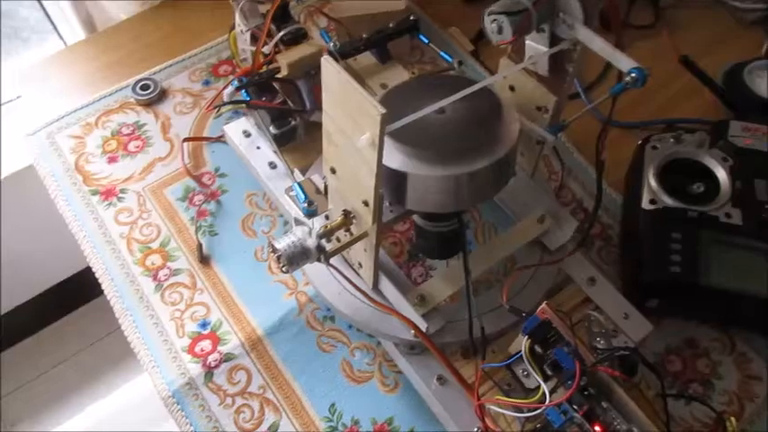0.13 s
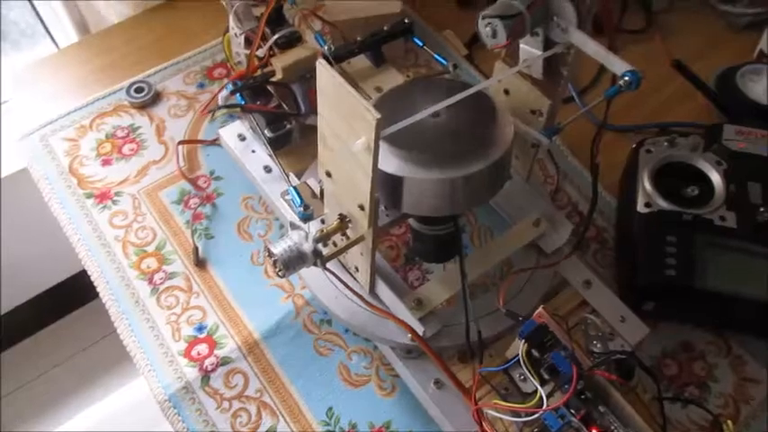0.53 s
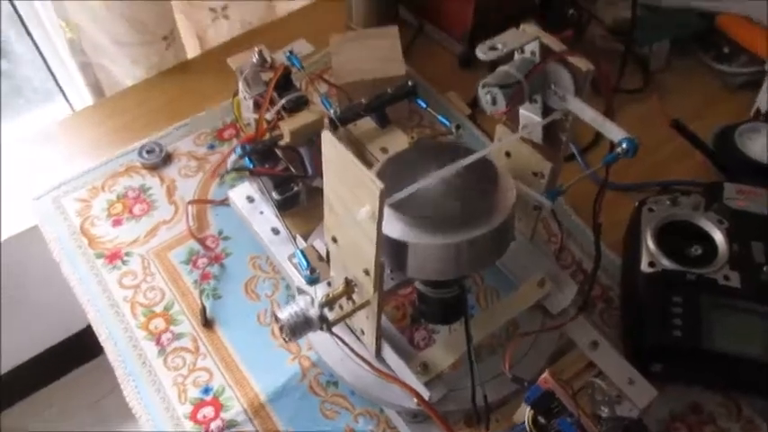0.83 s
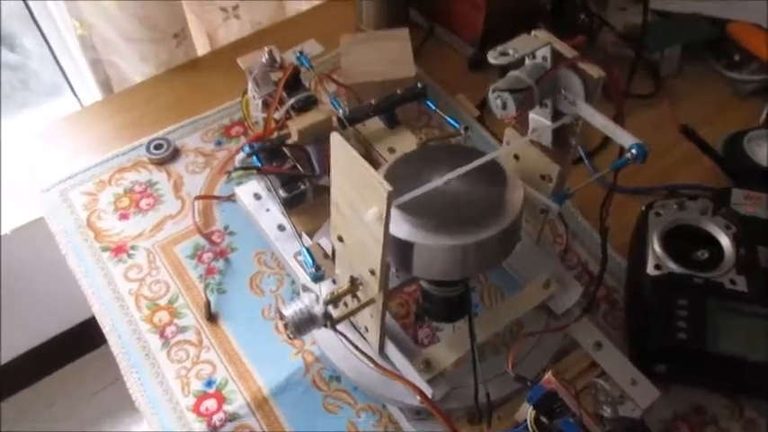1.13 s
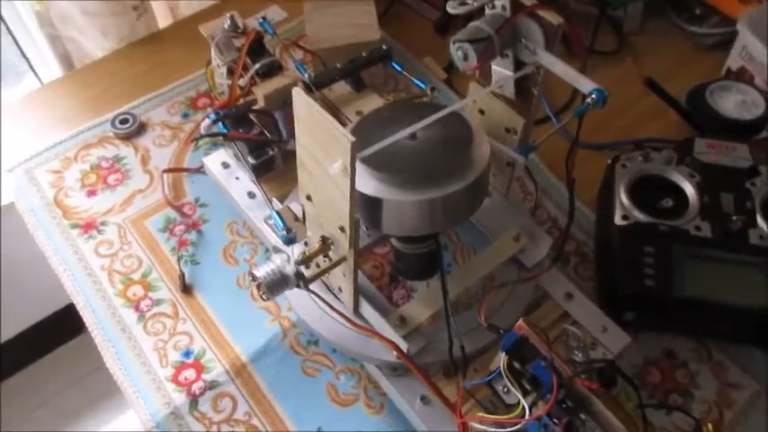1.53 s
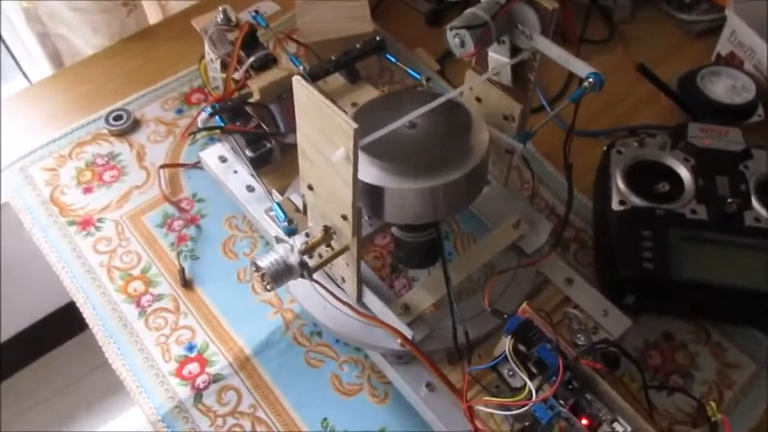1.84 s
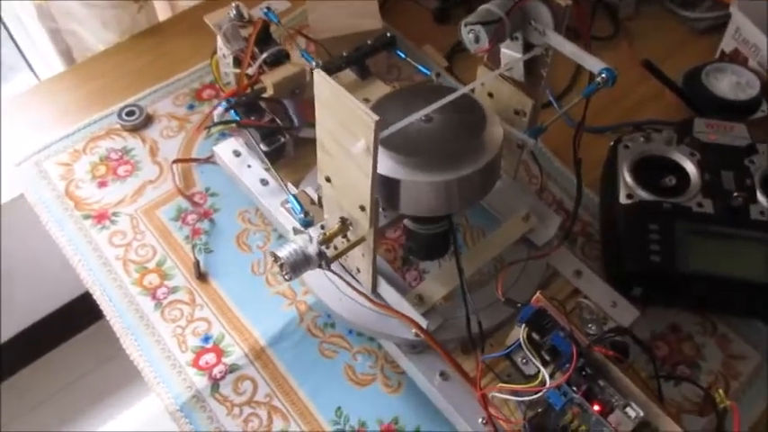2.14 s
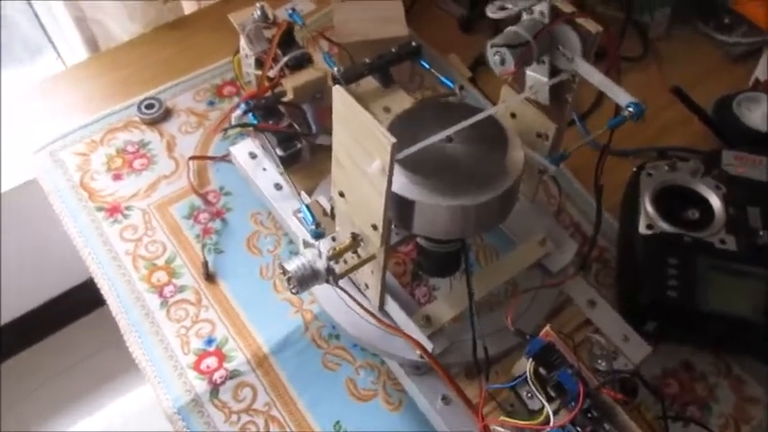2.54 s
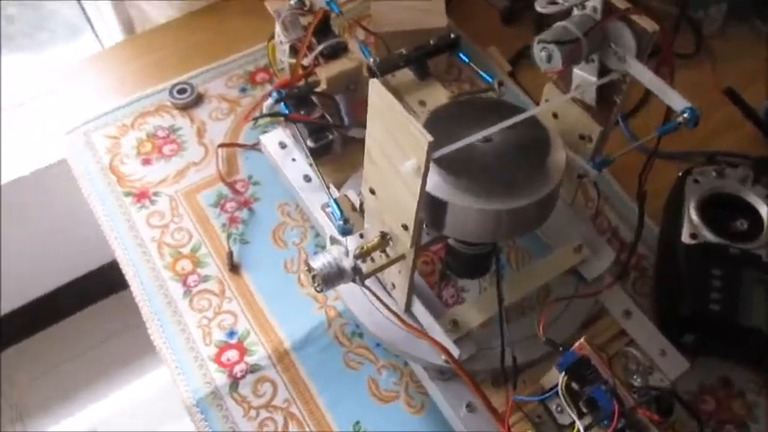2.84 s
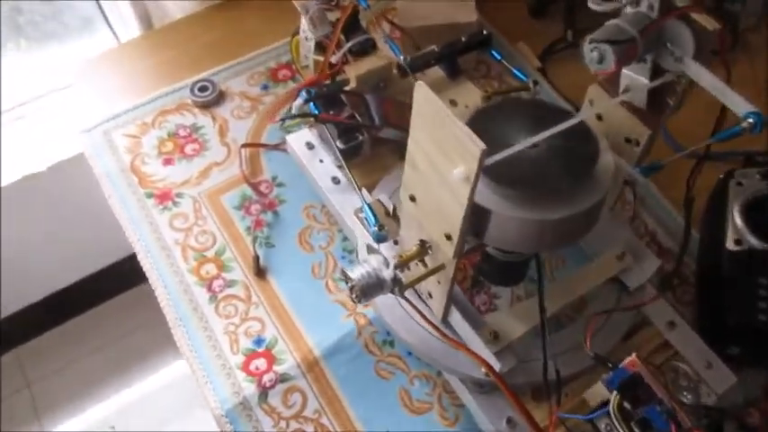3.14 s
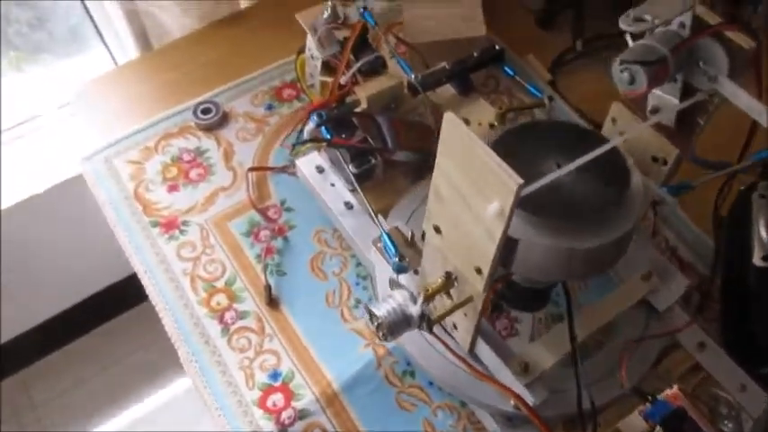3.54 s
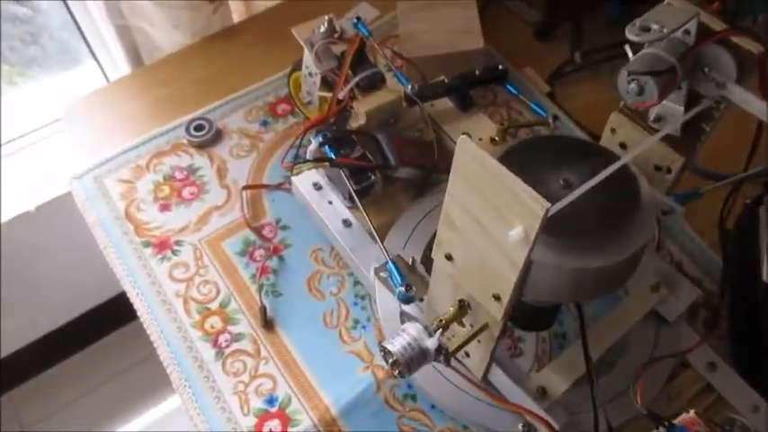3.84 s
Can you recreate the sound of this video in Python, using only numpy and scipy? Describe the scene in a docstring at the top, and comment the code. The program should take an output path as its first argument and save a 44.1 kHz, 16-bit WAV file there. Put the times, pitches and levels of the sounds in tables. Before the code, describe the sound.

A motor-driven steel flywheel cuts in abruptly after brief silence, whirring steadily while a loose metal joint ticks rapidly in ratchet-like pulses, with duller frame knocks beneath; close microphone, small room.

```python
"""Flywheel rattling in a gimbal on a table

Close by, a steel flywheel spins at steady speed on a small motor in a light gimbal frame; the sound cuts in abruptly.
The unbalanced rotor throws a loose joint to and fro: once a turn a bright metal tick rings the joint,
and nearly half a turn later a duller knock rings the frame and its upright plate; at times the joint rubs.
A slower wobble groups the ticks in about threes, like a ratchet. A short room tail follows these contacts;
under them filtered grains make the bearing whirr and wavering sines make the table hum."""
import sys
import numpy as np
from scipy import signal
from scipy.fft import rfft, irfft
from scipy.io import wavfile

SR = 44100
rng = np.random.default_rng(int(sys.argv[2]) if len(sys.argv) > 2 else 0)


def store_wav(level_fs):
    """Save 16-bit WAV to argv[1]."""
    pcm = np.round(np.clip(np.atleast_2d(level_fs), -1, 1) * 32767)
    wavfile.write(sys.argv[1], SR, pcm.T.astype(np.int16))


N = 176400
TIME = np.arange(N) / SR  # s
ROTOR_HZ, WOBBLE_HZ = 70.72, 22.55
# Course of the bearing whirr, which the hum partly follows: start_s, relative level_db
WHIRR_COURSE = [(.33, -40.5), (.68, -37), (.82, -34), (1.0, -39.5), (1.25, -35.5), (1.42, -37),
                (1.55, -34.5), (1.8, -34), (2.25, -36), (2.4, -33.5), (2.75, -36), (3.2, -33), (3.4, -36),
                (3.85, -34), (4, -35)]


def from_db(db):
    """Decibels to gain."""
    return 10 ** (np.asarray(db) / 20)


def rms_one(x):
    """Scale to unit rms."""
    return x / np.sqrt(np.mean(x ** 2) + 1e-20)


def curve(rows, at=TIME):
    """A time table, joined by straight lines."""
    rows = np.array(rows)
    return np.interp(at, rows[:, 0], rows[:, 1])


def drift(rate_hz):
    """Random wander of unit rms through `rate_hz` fresh points a second."""
    return rms_one(np.interp(TIME * rate_hz, np.arange(400), rng.standard_normal(400)))


def resonate(x, modes, wander=0):
    """Parallel damped modes (Hz, width Hz, dB) of alternating sign; pitches stray by the share `wander`."""
    out = 0
    for k, (hz, width_hz, db) in enumerate(modes):
        decay = np.exp(-np.pi * width_hz / SR)
        pitch_hz = hz * (1 + wander * drift(WOBBLE_HZ))
        spin = np.exp(2j * np.pi * np.cumsum(pitch_hz) / SR)
        # Shift the mode down to 0 Hz, smooth it there, and shift it back.
        shifted = (x + 1e-18) * spin.conj()
        envelope = signal.lfilter([1 - decay, 1 - decay], [1, -decay], shifted)
        out = out + (-1) ** k * from_db(db) * np.real(spin * envelope)
    return out


def colour(x, points):
    """Filter a sound by a (Hz, dB) curve, straight over log frequency."""
    hz, db = np.transpose(points)
    bin_hz = np.arange(N // 2 + 1) * SR / N
    gain = from_db(np.interp(np.log(bin_hz + 1), np.log(hz), db))
    return irfft(rfft(x) * gain, N)


def place(times, levels_db, bursts):
    """Lay one burst of force, its spectrum partly evened and its energy set by its level, at each time."""
    out = np.zeros(N + SR)
    spectra = rfft(bursts)
    bursts = irfft(spectra / np.sqrt(abs(spectra) + 1e-9))
    for s, db, burst in zip(times, levels_db, bursts):
        i = int(s * SR)
        out[i:i + len(burst)] += from_db(db) * burst / np.linalg.norm(burst)
    return out[:N]


def turns():
    """The moment in each turn at which the joint closes."""
    # How late in the turn the joint closes: start_s, delay_ms
    closing_lag = [(.33, 3.3), (.5, 3.0), (1.25, 4.1), (1.95, 4.3), (2.15, 3.9), (2.42, 5.4), (2.62, 4.6),
                   (3.25, 4.1), (3.65, 3.4), (4, 3.4)]
    s = np.arange(int(N / SR * ROTOR_HZ) + 1) / ROTOR_HZ
    return s + curve(closing_lag, s) / 1000


def with_hard_blows(s, db, rows):
    """Each hard blow takes the place of the nearest ordinary one."""
    s, db = s.copy(), db.copy()
    for at, level_db in rows:
        k = np.argmin(abs(s - at))
        s[k], db[k] = at, level_db
    return s, db


def ticks():
    """A snap with tiny rebounds rings the joint once a turn, harder at the crest of the wobble."""
    # Mean force of the rattle: start_s, relative level_db
    rattle_course = [(.33, -41), (.46, -31.5), (.67, -34), (.8, -26), (1.06, -27.5), (1.32, -19.5),
                     (1.8, -8.5), (2.2, -19.5), (2.45, -22.5), (2.65, -15), (2.92, -24.5), (3.12, -13.5),
                     (3.6, -13.5), (4, -11)]
    # The hardest ticks, on the same scale: start_s, relative level_db
    hardest_ticks = [(0.4694, -14), (0.7243, -14), (0.7671, -11), (0.7812, -12), (0.8094, -13),
                     (0.8237, -10), (0.8517, -15), (0.8943, -14), (0.9085, -13), (1.1347, -10),
                     (1.263, -12), (1.2912, -12), (1.305, -9), (1.3474, -11), (1.3759, -11), (1.4743, -12),
                     (1.4888, -14), (1.517, -13), (1.5731, -12), (1.6162, -11), (1.6452, -12),
                     (1.6583, -10), (1.7013, -10), (1.7293, -12), (1.7433, -12), (1.7858, -12),
                     (1.8142, -12), (1.8283, -9), (1.885, -8), (1.9555, -9), (1.97, -13), (1.9977, -11),
                     (2.0538, -9), (2.0828, -12), (2.096, -11), (2.2807, -13), (2.3237, -10), (2.338, -12),
                     (2.5775, -14), (2.5921, -12), (2.6207, -12), (2.6337, -9), (2.6768, -7), (2.7617, -12),
                     (2.7894, -12), (2.8042, -12), (2.9318, -14), (3.0302, -10), (3.0722, -11),
                     (3.1294, -14), (3.2135, -12), (3.299, -9), (3.3129, -9), (3.3408, -13), (3.3692, -13),
                     (3.3833, -12), (3.44, -12), (3.6796, -12), (3.7225, -10), (3.7366, -11), (3.7641, -13),
                     (3.7797, -13), (3.7945, -13), (3.8079, -7), (3.8216, -10), (3.8495, -12),
                     (3.8641, -12), (3.8777, -8), (3.9202, -8), (3.9483, -11), (3.9623, -10)]
    # Modes of the metal joint: pitch_hz, width_hz, level_db, change_db as the gimbal swings round
    joint_modes = [(1060, 540, -13.5, 1), (3726, 50, -0.5, 3), (4537, 210, -6.5, 1), (5620, 360, -8.5, 7),
                   (6345, 110, 4, -0.5), (6920, 220, 2, -1.5), (7390, 250, 2, 1), (8720, 184, -8.5, 5.5),
                   (9570, 246, -6, 3.5), (10140, 76, -3, -36), (10730, 240, -5.5, -14),
                   (11580, 920, -10, -1), (13400, 730, -14.5, -4), (14460, 790, -16, 1)]
    swing_db, scatter_db, soft_top_db, force_gain_db = 9.5, 6.5, -15.5, 27
    chatter_s = .00042  # time scale of the tiny rebounds
    after_rattle_db, after_rattle_s = -17, .005

    s = turns()
    wobble = np.cos(2 * np.pi * WOBBLE_HZ * (s - .012))  # a crest at .012 s
    db = curve(rattle_course, s) + swing_db * wobble
    db = np.minimum(db + scatter_db * rng.standard_normal(len(s)), soft_top_db)
    s, db = with_hard_blows(s, db, hardest_ticks)

    bursts = rng.standard_normal(size=(len(s), 700))
    t = TIME[:bursts.shape[1]]
    age = t / chatter_s
    bursts *= age * np.exp(1 - age) + from_db(after_rattle_db) * np.exp(-t / after_rattle_s)
    bursts[:, 0] = 1  # the first touch
    force = place(s - chatter_s, db + force_gain_db, bursts)

    swung = np.interp(TIME, [3.4, 3.75], [0, 1])  # the gimbal swings round, s
    joint = 0
    for k, (hz, width_hz, level_db, change_db) in enumerate(joint_modes):
        mode_db = change_db * swung + 1.8 * drift(ROTOR_HZ)
        ring = resonate(force * from_db(mode_db), [(hz, width_hz, level_db)], wander=.009)
        joint = joint + (-1) ** k * ring
    return joint + small_parts(force)


def small_parts(force):
    """Brackets ring along with the ticks while they bear on the joint."""
    # Their modes and when they bear: pitch_hz, width_hz, level_db, strongest_s, spread_s
    bracket_modes = [(4625, 210, -1.5, .79, .54), (4625, 210, 1, 2.07, .05), (4625, 210, -1.5, 2.62, .07),
                     (3800, 240, 1.5, 3.13, .03), (3800, 240, 1.5, 3.31, .03)]
    out = 0
    for hz, width_hz, db, s, spread_s in bracket_modes:
        bearing_on = np.exp(-((TIME - s) / spread_s) ** 2)
        out = out + bearing_on * resonate(force, [(hz, width_hz, db)])
    return out


def knocks():
    """On the way back the joint scuffs against the frame, which rings together with its upright plate."""
    # Course of the knocks: start_s, relative level_db
    knock_course = [(.33, -38), (.8, -31.5), (.98, -41), (1.25, -32), (1.4, -36), (1.52, -30.5),
                    (1.69, -34), (1.78, -28.5), (1.93, -34.5), (2.15, -30), (2.5, -32), (2.9, -32.5),
                    (3.25, -30), (3.4, -35), (4, -35)]
    # The hardest knocks: start_s, level_db above the usual force
    hardest_knocks = [(1.453, 8), (2.203, 7), (2.599, 8), (2.909, 9), (2.98, 6), (3.22, 6)]
    # Modes of the frame: pitch_hz, width_hz, level_db
    frame_modes = [(366, 84, -9), (655, 53, 0.5), (1196, 48, -6.5), (1407, 53, 2.5), (1709, 37, 5.5),
                   (1856, 76, 6.5), (2014, 246, 3.5), (2234, 104, 4.5), (2770, 96, -0.5)]
    # Ring of the upright plate against the knocks: start_s, level_db
    plate_course = [(.33, -6), (1.55, -6), (1.8, -2.5), (3.25, -4.5), (3.55, -6.5)]
    lag_turns, jitter_s, length_s = .46, .0007, .00085
    scatter_db, swing_db = 3, 3

    s = turns() + lag_turns / ROTOR_HZ
    s = s + jitter_s * rng.standard_normal(len(s))
    wobble = np.cos(2 * np.pi * WOBBLE_HZ * (s - .03))  # a crest at .03 s
    db = scatter_db * rng.standard_normal(len(s)) + swing_db * wobble
    s, db = with_hard_blows(s, np.minimum(db, swing_db), hardest_knocks)

    bursts = rng.standard_normal(size=(len(s), 400))
    age = TIME[:bursts.shape[1]] / length_s
    force = place(s - length_s, db, bursts * age * np.exp(-age))

    frame = from_db(-1) * rms_one(resonate(force, frame_modes))
    plate_modes = [(hz, 40, 0) for hz in (1000, 1040)]  # Hz, width Hz, dB
    plate = from_db(curve(plate_course)) * rms_one(resonate(force, plate_modes, wander=.02))
    return from_db(curve(knock_course)) * (frame - plate)


def scrapes():
    """Now and then the joint stays in contact and rubs, a broad rough surge."""
    # The rubs: centre_s, spread_s, level_db
    rubs = [(1.775, 0.057, -29), (2.37, 0.025, -27)]
    # Colour of the rubbing: pitch_hz, level_db per Hz
    rub_colour = [(600, -13.5), (1000, 3), (1900, -6), (3600, -9), (7000, -35)]
    pressure = sum(from_db(db) * np.exp(-((TIME - s) / spread_s) ** 2) for s, spread_s, db in rubs)
    return pressure * rms_one(colour(grains(), rub_colour))


def grains():
    """Dense tiny contacts of random sign and uneven size."""
    grains_per_s, spread_db = 4500, 3.2
    struck = rng.random(N) < grains_per_s / SR
    sign = rng.choice([-1, 1], N)
    size = from_db(spread_db * np.minimum(rng.exponential(1, N), 5))
    return struck * sign * size


def bearings():
    """The rolling balls make a grainy whirr."""
    # Colour of the bearing whirr: pitch_hz, level_db per Hz
    whirr_colour = [(25, -22), (50, -13), (125, 0), (155, -8.5), (185, -1), (240, -5.5), (300, -2.5),
                    (420, -5.5), (660, -2), (780, -6), (1000, 6), (1220, 1), (1900, 0), (2400, -0.5),
                    (2900, 5), (3800, 2.5), (4600, 2), (7100, -4), (11700, -9), (12700, -6.5), (15000, -31)]
    gain_db = 6.5
    return from_db(gain_db + curve(WHIRR_COURSE)) * rms_one(colour(grains(), whirr_colour))


def hum():
    """The unbalance shakes the table, mostly at odd multiples of rotor speed, louder as the whirr rises."""
    # Partials of the hum: multiple of the rotor speed, rms_db before swing and waver
    hum_partials = [(1, -51.5), (3, -66.5), (5, -51), (7, -56), (9, -51.5), (12, -54)]
    whirr_db = curve(WHIRR_COURSE)
    swing_db = .85 * (whirr_db - np.mean(whirr_db))  # a share of the whirr's swing
    out = 0
    for multiple, rms_db in hum_partials:
        amplitude = np.sqrt(2) * from_db(rms_db + swing_db + 3 * drift(13))
        cycles = round(multiple) * ROTOR_HZ * TIME + rng.random()
        out = out + amplitude * np.sin(2 * np.pi * cycles)
    return out


def room(x):
    """The short, faint tail of a small room: decaying noise, 5 ms behind the direct sound."""
    t60_s, tail_db = .15, -11
    t = TIME[:SR // 2]
    tail = rng.standard_normal(len(t)) * from_db(-60 * t / t60_s) * (t > .005)
    return x + from_db(tail_db) * signal.fftconvolve(x, tail / np.linalg.norm(tail))[:N]


def scene():
    """The whole rig, heard from close by."""
    contacts = room(ticks() + knocks() + scrapes())
    return (contacts + bearings() + hum())[None]


def record(dry):
    """The sound cuts in abruptly at 0.32 s; peaks are rounded and the top is cut."""
    start_s, cutoff_hz = .32, 15200
    x = np.tanh(dry * (TIME >= start_s))
    top_cut = signal.ellip(10, .2, 70, cutoff_hz, fs=SR, output="sos")
    return signal.sosfilt(top_cut, x)


dry = scene()
out = record(dry)
store_wav(out)
```